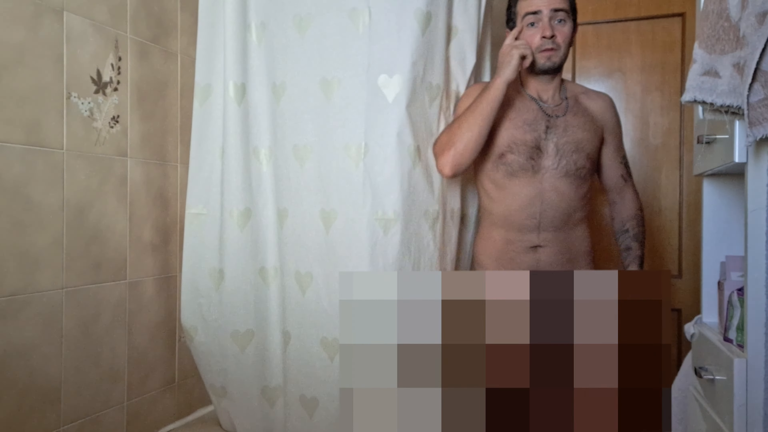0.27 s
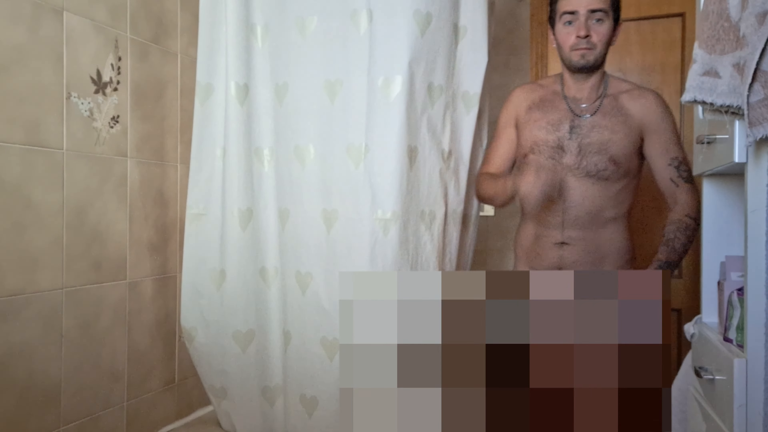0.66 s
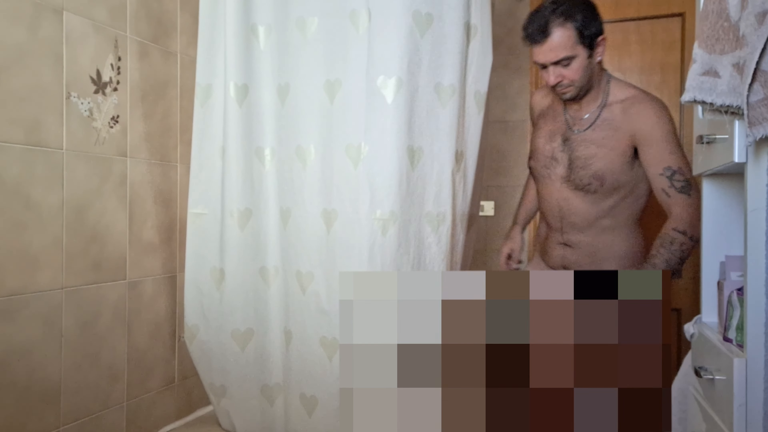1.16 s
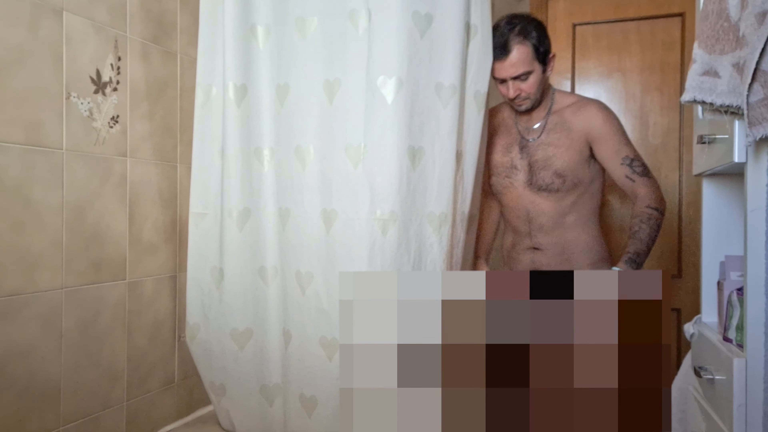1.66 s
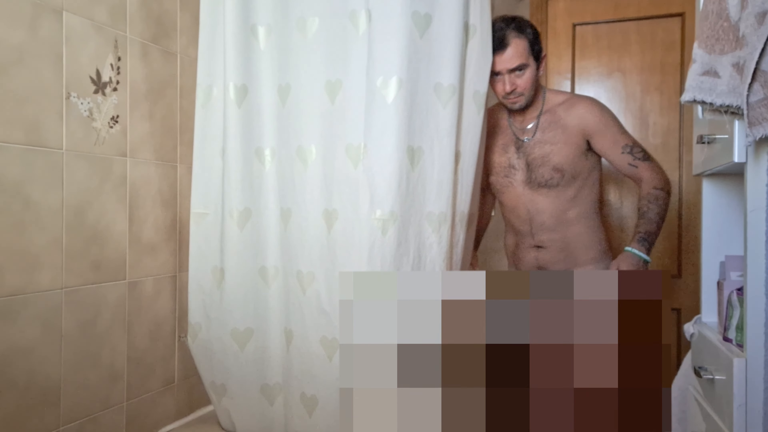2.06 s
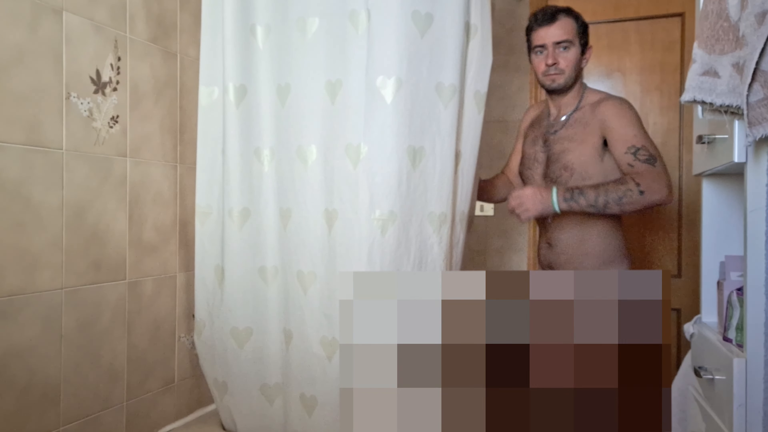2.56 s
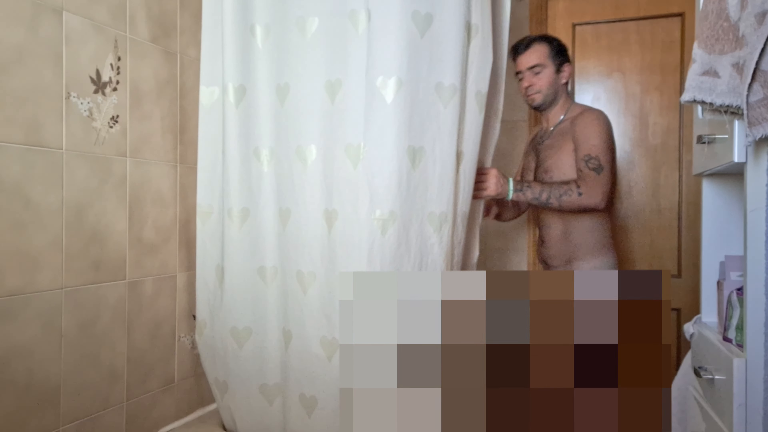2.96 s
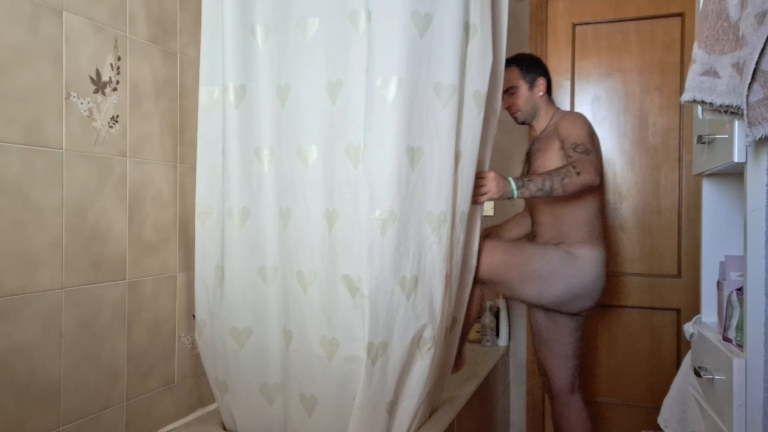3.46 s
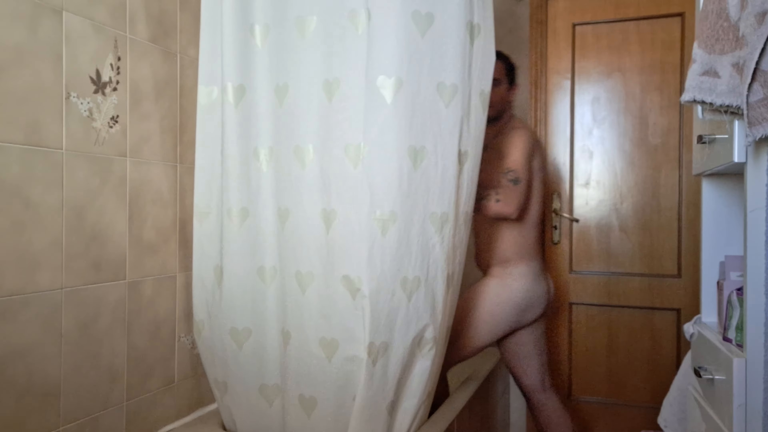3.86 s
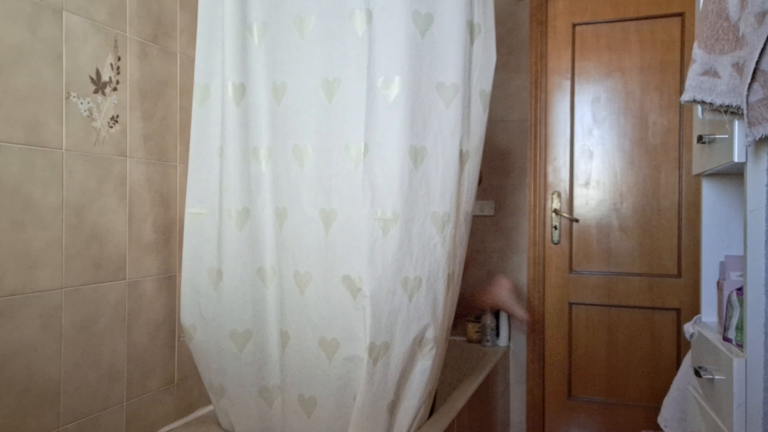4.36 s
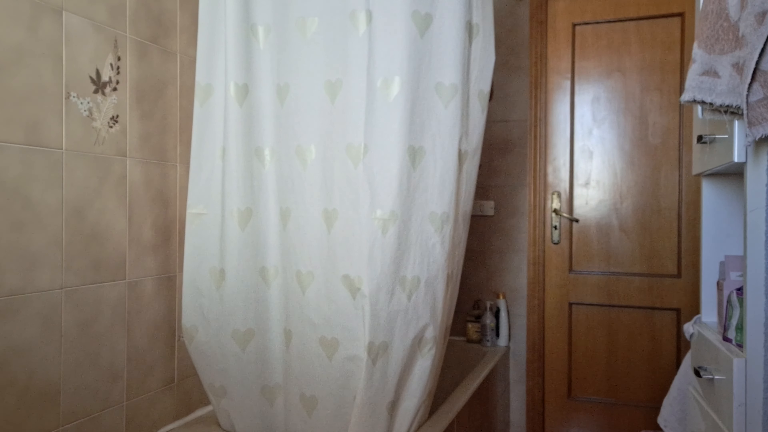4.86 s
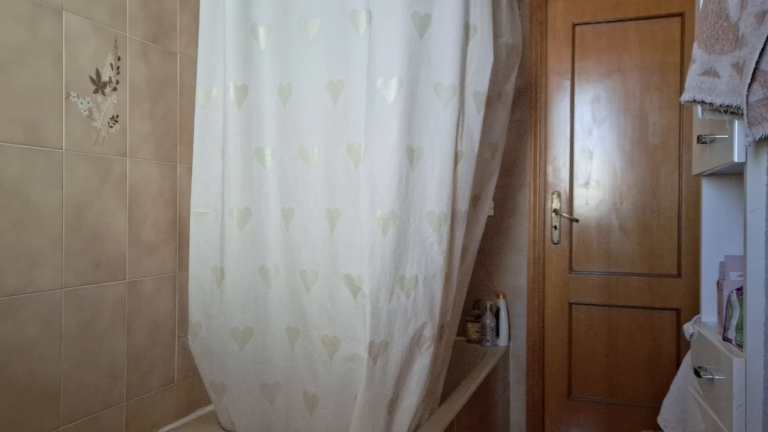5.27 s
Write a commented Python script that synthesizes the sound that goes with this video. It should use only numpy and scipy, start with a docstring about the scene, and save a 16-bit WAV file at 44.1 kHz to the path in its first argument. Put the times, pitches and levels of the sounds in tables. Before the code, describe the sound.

Someone moves softly in a tiled bathroom, slippers slap the floor, then a plastic shower curtain rustles shut with rattling hooks.

```python
"""A soft rustle over a low boom: someone moves about a small tiled bathroom, each shift of weight driving
the room's lowest modes. Light taps and squeaks follow, two slippers slap the floor with a click of trapped
air that the tiles echo, and feet thud into the tub. The plastic curtain rustles and is at last drawn shut,
its hooks rattling along the metal rod. Near the end the sound is cut for an instant and fades back in."""
import sys
import numpy as np
from scipy import signal
from scipy.fft import rfft, irfft, next_fast_len
from scipy.io import wavfile
from scipy.ndimage import uniform_filter1d, map_coordinates

SR = 44100
rng = np.random.default_rng(int(sys.argv[2]) if len(sys.argv) > 2 else 0)


def wav_out(sig):
    """Save sig, one row per channel (or a flat mono array), as 16-bit PCM at SR to the path in sys.argv[1]."""
    wavfile.write(sys.argv[1], SR, np.round(np.clip(np.atleast_2d(sig).T, -1, 1) * 32767).astype(np.int16))


N = 243873
CUT_S, RETURN_S, FADE_IN_S = 5.3415, 5.348, 0.029


def amp(db):
    """Amplitude ratio of a level in decibels."""
    return 10 ** (np.asarray(db) / 20)

def unit(x):
    """Normalisation to an rms of 1."""
    return x / np.sqrt(np.mean(x ** 2) + 1e-20)

def along(points, hz):
    """Interpolation of (frequency, value) points on a logarithmic frequency axis."""
    f, v = np.transpose(points)
    return np.interp(np.log(hz + 1), np.log(f + 1), v)

def filtered(x, response):
    """Linear filtering: the spectrum is multiplied by a frequency response."""
    m = next_fast_len(x.shape[-1] + SR // 2)
    return irfft(rfft(x, m) * response(np.fft.rfftfreq(m, 1 / SR)), m)[..., :x.shape[-1]]

def modes(table):
    """Modal superposition: second-order resonances summed with alternating sign."""
    return lambda f: sum((-1) ** k * amp(db) * 1j * f * width / (hz * hz - f * f + 1j * f * width)
                         for k, (hz, width, db) in enumerate(table))

def decay(t, db, hold, t60):
    """Exponential decay: after the hold, the level falls 60 dB every t60 seconds."""
    return amp(db - 60 * np.maximum(t - hold, 0) / t60)

def swells(rows, levels_db, t60):
    """Incoherent addition: envelopes rise, hold, decay and add in power; none outlasts the cut."""
    t, power = np.arange(N) / SR, 0
    for (start, rise, hold, *_), db in zip(rows, levels_db):
        attack = np.clip((t - start) / rise, 0, 1) ** 0.89
        alive = (t < RETURN_S) | (start > CUT_S)
        power += (attack * decay(t - start - rise, db, hold, t60) * alive) ** 2
    return np.sqrt(power)

# Likeness of left and right: (frequency [Hz], correlation [ratio])
COHERENCE = [(60, 0.98), (180, 0.88), (300, 0.71), (550, 0.38), (1650, 0), (15000, 0.017)]
def stereo(two):
    """Spatial coherence: independent signals mix into left and right, alike at long wavelengths."""
    angle = lambda hz: np.arccos(along(COHERENCE, hz)) / 2
    mid, side = filtered(two, lambda hz: np.array([np.cos(angle(hz)), np.sin(angle(hz))]))
    return np.array([mid + side, mid - side])

# Reverberation of the tiled room: (frequency [Hz], t60 [s])
TILE_T60 = [(100, 0.61), (500, 0.49), (1500, 0.4), (4000, 0.42), (12000, 0.31)]
def tile_echo(length):
    """Diffuse reverberation: a noise tail of unit energy, each frequency decaying at its own rate."""
    hz, t, spectrum = signal.stft(rng.standard_normal((2, length)), SR, nperseg=256)
    spectrum *= amp(-60 * t / along(TILE_T60, hz)[:, None])
    echo = stereo(signal.istft(spectrum, SR, nperseg=256)[1][:, :length])
    return echo / np.linalg.norm(echo[0])

def patchy_noise(depth_db):
    """Random modulation: two noises share patches of gain in time and frequency."""
    spectrum = signal.stft(rng.standard_normal((2, N)), nperseg=512)[2]
    patches = uniform_filter1d(uniform_filter1d(rng.standard_normal(spectrum.shape[1:]), 8, 0), 8, 1)
    return signal.istft(spectrum * amp(depth_db * unit(patches)), nperseg=512)[1][:, :N]

# Movements of body and curtain, the last four levels relative to the swish:
# (time [s], rise [s], hold [s], swish [dB], folds [dB], scrape [dB], sheen [dB], weight [dB])
MOVEMENTS = [(0.0, 0.0023, 0.016, -68.5, 2.5, -15, -30, 9), (.06, 0.065, 0.23, -61, -3, -5, 2.5, -9),
             (.36, .05, 0.054, -72.5, 6, -3, 9, 1), (0.449, 0.061, 0.029, -60.5, 1.5, -6.5, 0.5, -0.5),
             (.56, 0.033, 0.037, -61, -2, -5, 3, -12), (.68, 0.053, 0.2, -77, 5.5, -5, 6.5, -3),
             (.9, 0.036, 0.26, -83, 11, -8, 10, 7), (1.28, 0.034, .03, -63.5, -10, -6, -3, -6),
             (1.647, 0.019, 0.016, -81.5, 11, 11.5, 23.5, 13),
             (1.68, 0.033, 0.06, -70.5, -14, 1.5, -13, -8), (1.85, 0.064, 0.26, -76.5, -1, 1, 9.5, 6),
             (2.335, 0.038, 0.04, -56, -9, -3.5, -1, -11), (2.43, 0.032, 0.046, -50, -4, -11, -5.5, -7),
             (2.499, 0.061, 0.011, -55, -4.5, 3, 2.5, -4.5),
             (2.721, 0.093, 0.073, -52.5, -4.5, -4.5, -11.5, -3),
             (2.899, 0.061, 0.011, -51, -1.5, 1, 0, -6), (3.115, 0.022, 0.0089, -52.5, -11, -2, -10, -10),
             (3.245, 0.013, 0.019, -55.5, -7.5, -5, -10, -8), (3.36, .04, 0.11, -73, 1, -5, 2, -2),
             (3.49, 0.046, 0.058, -64, -1, 0, -0.5, 0), (3.58, .1, .05, -58, -4.5, -7.5, -25, -1),
             (3.7, 0.097, 0.038, -49, -6, -17, -13.5, -8), (3.78, 0.051, 0.2, -51.5, -4, 1, -1.5, -6),
             (4.069, 0.028, .01, -48.5, -3.5, -3, -10, -0.5), (4.2, 0.041, 0.043, -67, 7, 9.5, -9, 15.5),
             (4.309, 0.09, 0.26, -58.5, -2.5, 1.5, 8.5, -2.5), (4.67, 0.055, 0.16, -55, -4.5, -2.5, 7, -2),
             (4.821, 0.1, 0.072, -42, -4, 0.5, -5, -11), (5.02, .008, .02, -36, -9.5, .6, 2.5, -28),
             (5.075, 0.019, 0.0082, -33, -9, 2.5, -1.5, -15),
             (5.14, 0.044, 0.058, -36.5, -7.5, 3.5, 0, -12.5),
             (5.22, .03, 0.093, -35.5, -5.5, 3.5, -2, -11.5), (5.345, .004, 0.064, -47.5, -0.5, 2, 8.5, -6),
             (5.42, .03, .1, -50.5, 1, -2, 7.5, -10)]
# Time to fade by 60 dB: (swish [s], folds [s], scrape [s], sheen [s], weight [s])
MOVEMENT_T60 = [0.65, 0.7, 0.65, 0.52, 0.63]
def movement_envelopes():
    """Common excitation: each movement drives four bands of rustle and puts weight on the floor."""
    swish_db, *relative_db = np.transpose(MOVEMENTS)[3:]
    levels_db = [swish_db] + [swish_db + db for db in relative_db]
    return [swells(MOVEMENTS, db, t60) for db, t60 in zip(levels_db, MOVEMENT_T60)]

# Spectrum of the rustle: (frequency [Hz], relative level [dB])
RUSTLE_SPECTRUM = [(110, -18), (180, -4), (272, -2.5), (316, -1.5), (354, 0), (411, 0.5), (681, -4),
                   (1240, -6.5), (1910, -4), (4280, -4.5), (6710, -11.5), (15000, -8.5), (15900, -11)]
def rustle():
    """Friction noise: big folds sound low, swish and scrape in the middle, fine crinkles on top."""
    swish, folds, scrape, sheen, _ = movement_envelopes()
    direct = filtered(patchy_noise(depth_db=1.5), lambda hz: amp(along(RUSTLE_SPECTRUM, hz)))
    reflected = signal.fftconvolve(direct, tile_echo(SR // 4), axes=1)[:, :N]  # many narrow peaks
    noise = stereo(direct + amp(-8.5) * reflected)
    below = lambda hz, edge_hz: 1 / (1 + (hz / edge_hz) ** 8)
    def band(low_hz, high_hz):
        return unit(filtered(noise, lambda hz: np.sqrt((1 - below(hz, low_hz)) * below(hz, high_hz))))
    return (swish * band(847, 2080) + folds * band(110, 934)
            + scrape * band(2580, 6330) + sheen * band(6350, 15200))

def ringing(table, steady):
    """Random excitation: noise passes twice through the modes; steady (0-1) evens out its envelope."""
    driven = stereo(filtered(rng.standard_normal((2, N)), lambda f: modes(table)(f) ** 2))
    analytic = signal.hilbert(driven, next_fast_len(N))[:, :N]
    envelope = np.abs(analytic).mean(axis=0) + 1e-9
    return unit(analytic.real / envelope ** steady)

# Weight shifting on floor and tub: (time [s], level [dB])
WEIGHT_SHIFTS = [(0.0, -48), (.15, -56), (.45, -64), (.65, -56), (.8, -68), (.95, -57.5), (1.15, -72),
                 (1.45, -50), (1.65, -61), (1.94, -70), (2.0, -50), (2.25, -57.5), (2.47, -58),
                 (2.7, -70.5), (3.0, -56), (3.3, -67), (3.57, -62), (3.8, -66), (4.15, -61), (4.72, -58),
                 (4.95, -49), (5.3, -51.5), (5.53, -55)]
# Lowest and next higher room modes: (frequency [Hz], bandwidth [Hz], gain per pass [dB])
DEEP_MODES = [(54.07, 5.2, -4.5), (40.1, 9.2, -5.5), (27, 23, -12)]
UPPER_MODES = [(82.9, 17.6, -4.5), (119, 16.4, -2.5), (156.6, 20, -4.5)]
def room_boom(waver_db=3, wavers_per_s=12):
    """Standing waves: pushes on floor and tub keep the room modes ringing."""
    t = np.arange(N) / SR
    knots = rng.standard_normal(int(N / SR * wavers_per_s) + 4)
    deep_db = np.interp(t, *np.transpose(WEIGHT_SHIFTS))
    deep_db += waver_db * map_coordinates(knots, [t * wavers_per_s])
    weight = movement_envelopes()[-1]
    return amp(deep_db) * ringing(DEEP_MODES, steady=0.56) + weight * ringing(UPPER_MODES, steady=0.49)

# Spectrum of the still room: (frequency [Hz], relative level [dB])
AMBIENT_SPECTRUM = [(20, -1.5), (74, 3.5), (215, -13.5), (366, -19.5), (526, -28), (778, -16), (1250, -33),
                    (2070, -21.5), (2730, -39), (4040, -30), (10500, -28.5), (15900, -41)]
def room_tone(level_db=-63.5):
    """Stationary noise: the faint rumble and hiss of the room at rest."""
    noise = filtered(rng.standard_normal((2, N)), lambda hz: amp(along(AMBIENT_SPECTRUM, hz)))
    return amp(level_db) * unit(stereo(noise))

# Small taps, scuffs and squeaks: (time [s], level [dB], frequency [Hz], hold [s])
CONTACTS = [(0.92, -75, 2000, 0.049), (1.028, -75, 3130, .04), (1.296, -60.5, 1330, .04),
            (1.683, -66, 1520, .05), (1.916, -69, 2120, 0.075), (2.355, -57, 820, 0.037),
            (3.256, -56.5, 900, 0.016), (3.613, -59, 2670, 0.024), (4.099, -53.5, 720, .034),
            (4.386, -55.5, 2900, .022), (4.435, -52, 3420, .02), (4.527, -56.5, 4400, .045),
            (4.688, -57, 786, .022), (4.705, -55, 1870, 0.044), (4.723, -52.5, 4960, 0.069),
            (4.791, -50, 2980, 0.018), (4.797, -49, 4235, 0.038), (4.932, -43, 2200, 0.06),
            (5.457, -38.5, 638, 0.021)]
# Their decay: (frequency [Hz], t60 [s])
CONTACT_T60 = [(700, .33), (2000, 0.27), (5000, 0.17)]
def taps():
    """Damped resonance: each light contact is a note of narrow-band noise that holds, then dies."""
    out, t = np.zeros((2, N + SR)), np.arange(SR // 2) / SR
    attack = 1 - np.exp(-t / 0.002)
    for start, db, hz, hold in CONTACTS:
        noise = stereo(rng.standard_normal((2, len(t))))
        note = unit(filtered(noise, lambda f: modes([(hz, 0.21 * hz, 0)])(f) ** 2))
        envelope = attack * decay(t, db, hold, along(CONTACT_T60, hz))
        out[:, round(start * SR):][:, :len(t)] += envelope * note
    return out[:, :N]

# Soles striking the floor: (time [s], relative level [dB], cavity frequency [Hz],
# cavity bandwidth [Hz], treble cutoff [Hz], crack relative to cavity [dB])
SOLE_IMPACTS = [(1.368, -26, 714, 430, 9300, -10.5), (1.425, -34.5, 635, 596, 6000, -11.5),
                (1.473, -56, 2240, 1500, 5070, -18), (1.980, -16.5, 1195, 1340, 4400, -8),
                (2.02, -19.5, 1190, 940, 3930, -11)]
def slipper_slaps():
    """Impulse response: one sharp click of trapped air, then mostly the echo of the tiles."""
    out, t = np.zeros((2, N + SR)), np.arange(SR) / SR
    build_up = 1 - np.exp(-t / 0.0028)
    for start, db, hz, width_hz, edge_hz, crack_db in SOLE_IMPACTS:
        impulse = amp(18.5) * tile_echo(SR) * build_up
        impulse[:, 0] = 1  # the direct click
        cavity = modes([(hz, width_hz, 0), (2500, 6000, crack_db), (420, 300, -11)])
        treble_loss = lambda f: (1 + 1.4j * f / edge_hz - (f / edge_hz) ** 2) ** 1.1
        slap = filtered(impulse, lambda f: cavity(f) / treble_loss(f))
        out[:, round(start * SR):][:, :SR] += amp(db + 17.5) * slap
    return out[:, :N]

# Heavy steps: (time [s], level [dB], mode frequency [Hz], rise [s], hold [s], t60 [s])
FOOTFALLS = [(1.40, -39.5, 118.3, 0.024, 0.038, 0.39), (2.0, -39, 117, 0.056, 0.055, 0.62),
             (3.54, -53.5, 115, 0.014, 0.11, 0.24), (4.197, -38.5, 53.74, 0.051, 0.26, 0.48),
             (4.829, -48, 117, 0.013, 0.12, 0.46), (5.372, -40, 119.6, 0.027, .2, .5)]
def foot_thuds():
    """Single-mode response: one room mode swells under the weight of a step, holds and dies away."""
    out, t = np.zeros(N + SR), np.arange(SR) / SR
    for start, db, hz, rise, hold, t60 in FOOTFALLS:
        envelope = decay(t, db, hold, t60) * (1 - np.exp(-(t / rise) ** 2))
        out[round(start * SR):][:SR] += envelope * np.sin(2 * np.pi * hz * t)
    return out[:N]

# Pulls that shake the hooks: (time [s], rise [s], hold [s], relative level [dB])
HOOK_PULLS = [(3.115, .002, 0.017, -56), (4.33, 0.078, 0.28, -59.5), (4.8, 0.16, .06, -55),
              (5.02, .01, 0.027, -35.5), (5.07, 0.027, 0.0087, -27), (5.16, .05, .02, -33),
              (5.232, .012, .02, -27.5)]
# Resonances of the metal rod, passed twice: (frequency [Hz], bandwidth [Hz], gain per pass [dB])
ROD_MODES = [(2480, 270, 4), (2190, 380, 3), (3330, 180, 3), (4530, 220, 1.5), (5700, 400, -0.5),
             (6020, 130, 3.5), (11600, 990, -2.5), (14100, 260, -23)]
def curtain_hooks(ticks_per_s=900):
    """Impact excitation: dense, uneven ticks of the hooks ring the rod, blurred by the tiles."""
    ticks = (rng.random(N) < ticks_per_s / SR) * rng.standard_normal(N)
    envelope = swells(HOOK_PULLS, np.transpose(HOOK_PULLS)[3], t60=0.1)
    rod = envelope * unit(filtered(ticks, lambda f: modes(ROD_MODES)(f) ** 2))
    return 0.48 * rod + signal.fftconvolve(rod[None], tile_echo(SR // 8), axes=1)[:, :N]

# Sudden tugs and brushes: (time [s], level [dB], centre frequency [Hz], bandwidth [Hz], hold [s])
CURTAIN_TUGS = [(3.128, -52, 3000, 5000, 0.012), (4.086, -46.5, 1820, 3000, 0.023),
                (4.205, -54, 4000, 3500, .02), (5.027, -36, 9000, 12000, .02),
                (5.078, -39, 5000, 9000, .031), (5.237, -26, 6000, 12000, 0.025)]
def curtain_tugs():
    """Broadband transients: bursts of noise start at once, hold, then decay among the tiles."""
    out, t = np.zeros((2, N + SR)), np.arange(SR // 2) / SR
    attack = 1 - np.exp(-t / 0.002)
    for start, db, hz, width_hz, hold in CURTAIN_TUGS:
        noise = stereo(rng.standard_normal((2, len(t))))
        burst = unit(filtered(noise, modes([(hz, width_hz, 0)])))
        out[:, round(start * SR):][:, :len(t)] += attack * decay(t, db, hold, t60=0.21) * burst
    return out[:, :N]

def scene():
    """Superposition: the sound pressures of all sources in the bathroom add."""
    return (rustle() + room_boom() + foot_thuds() + slipper_slaps() + taps()
            + curtain_hooks() + room_tone() + curtain_tugs())

# Unequal microphones: (frequency [Hz], left over right [dB])
IMBALANCE = [(60, 5.5), (150, 1.5), (380, 3.5), (950, 2.0), (2380, 2), (5980, 1), (15000, -5)]
def record(dry, top_hz=15780):
    """Channel imbalance, gating and band limit: unequal microphones, a brief cut, a fade-in."""
    t = np.arange(N) / SR
    picked_up = filtered(dry, lambda hz: amp(along(IMBALANCE, hz) * [[0.5], [-0.5]]))
    gate = np.where(t < CUT_S, 1, np.clip((t - RETURN_S) / FADE_IN_S, 0.02, 1))
    return filtered(picked_up * gate, lambda hz: hz < top_hz)


dry = scene()
out = record(dry)
wav_out(out)
```